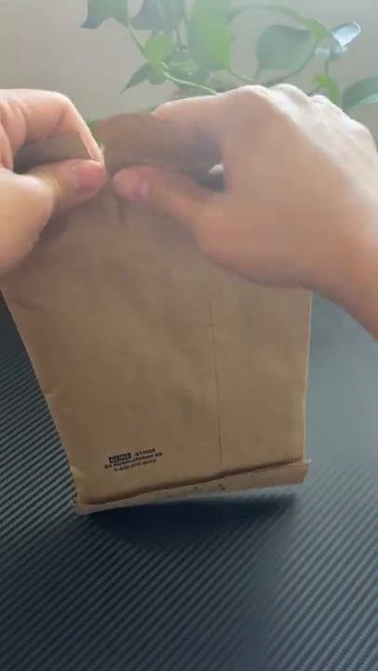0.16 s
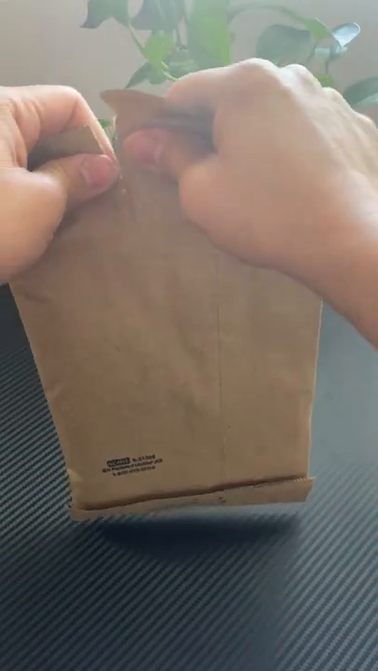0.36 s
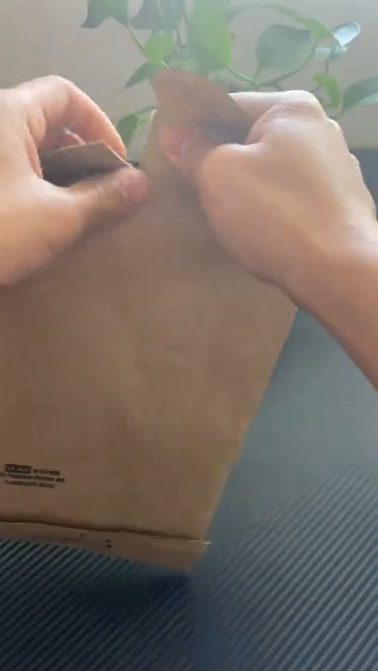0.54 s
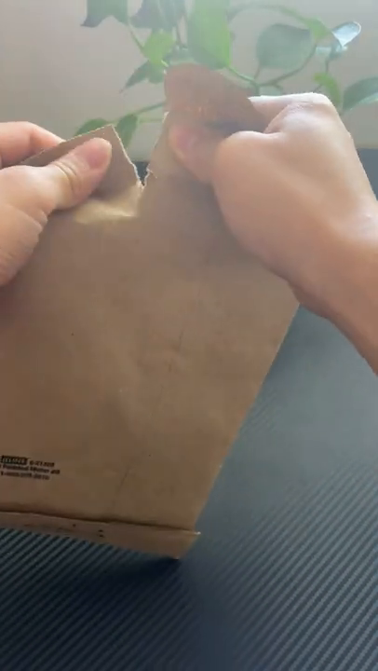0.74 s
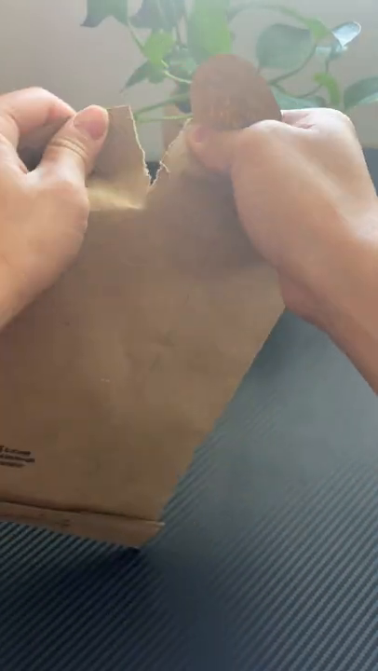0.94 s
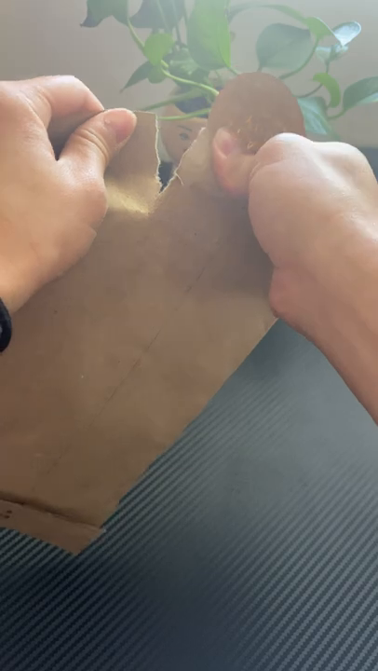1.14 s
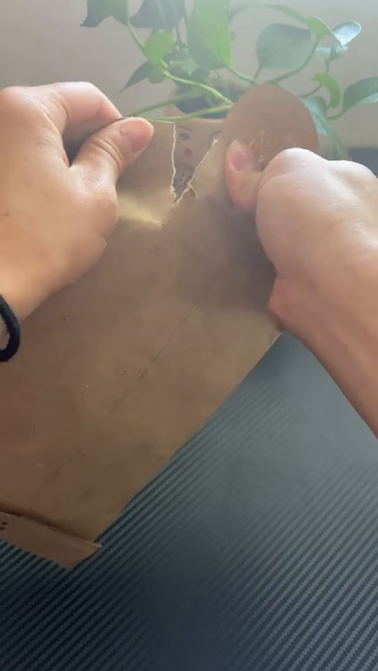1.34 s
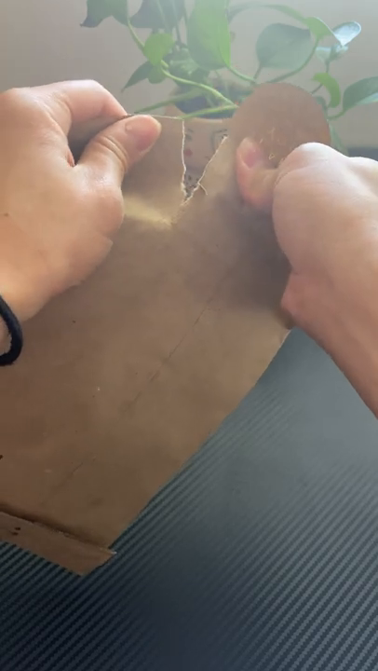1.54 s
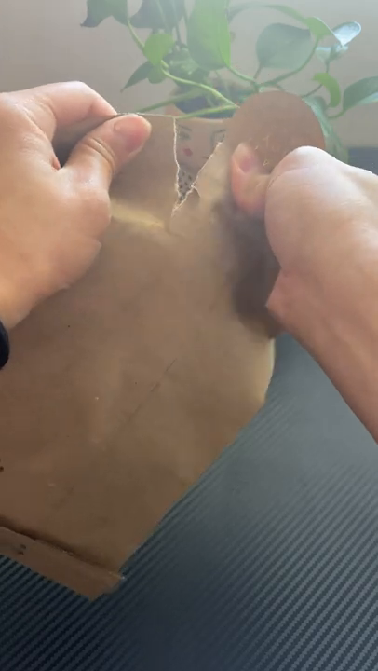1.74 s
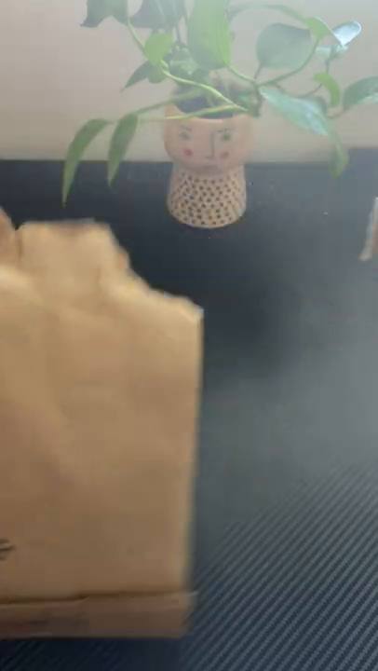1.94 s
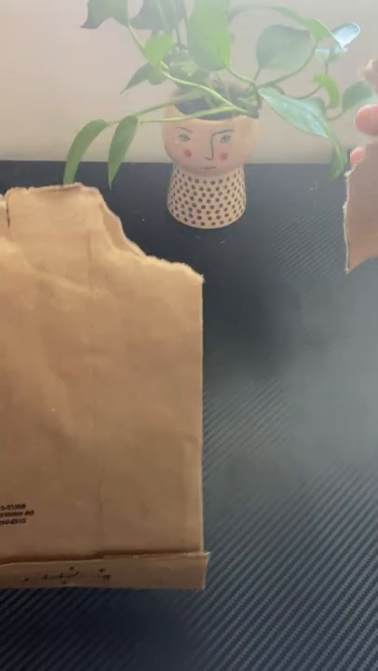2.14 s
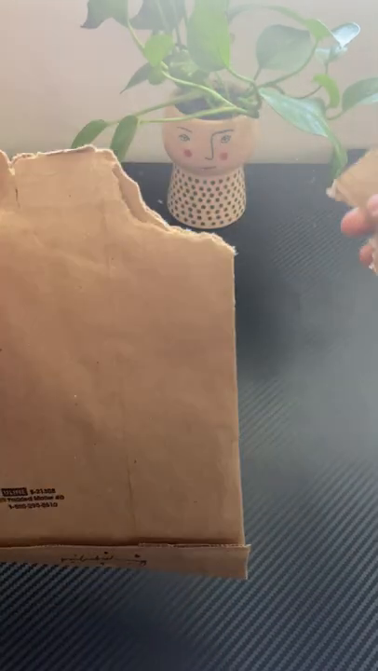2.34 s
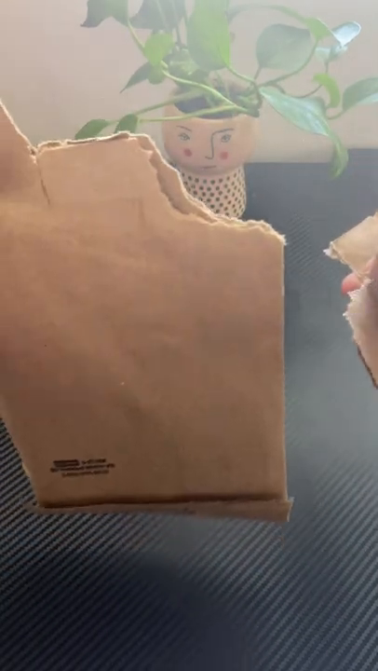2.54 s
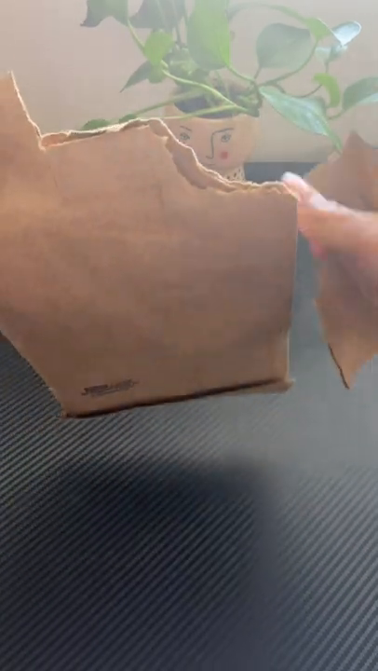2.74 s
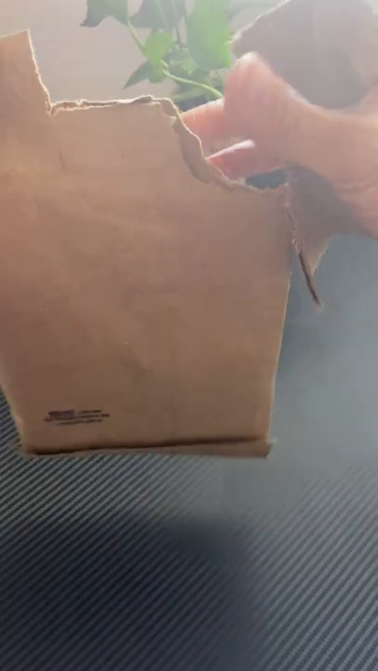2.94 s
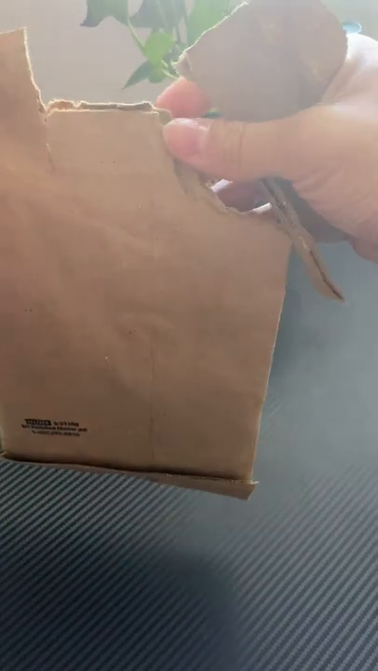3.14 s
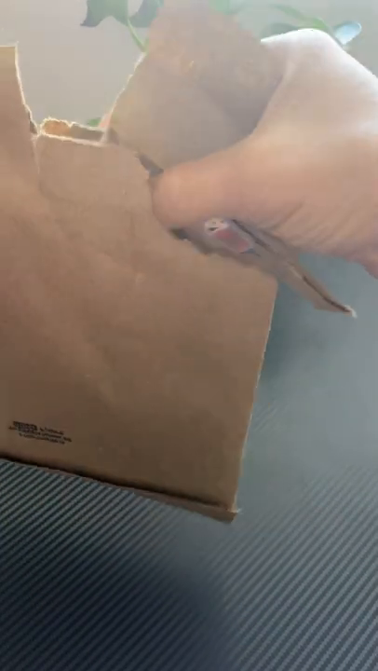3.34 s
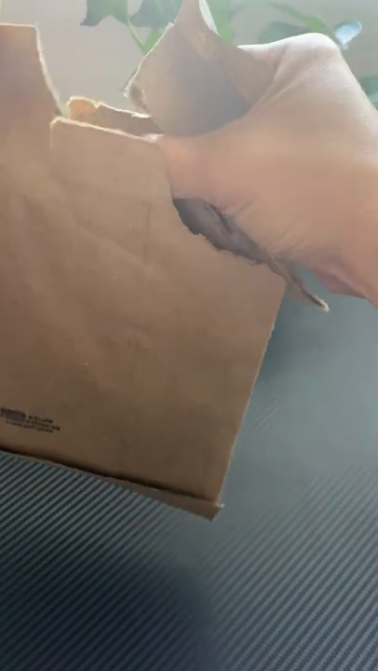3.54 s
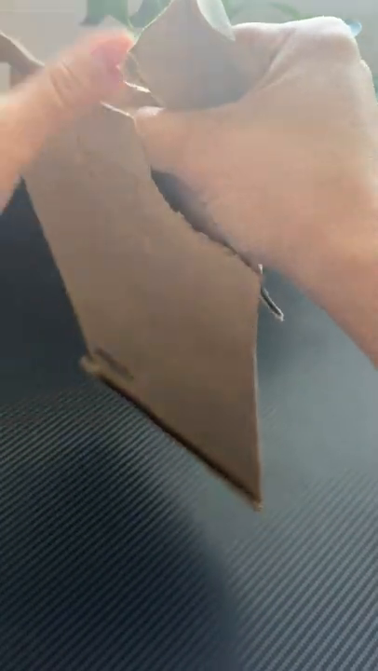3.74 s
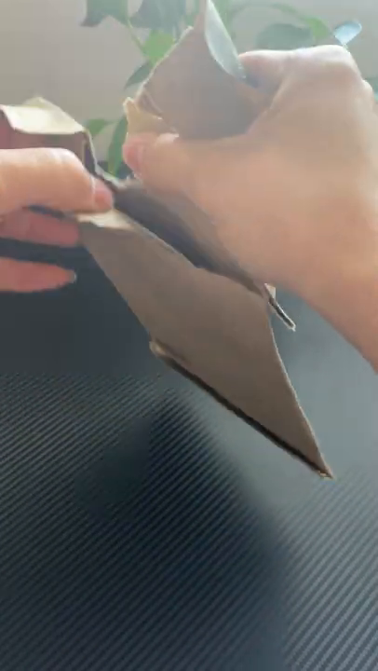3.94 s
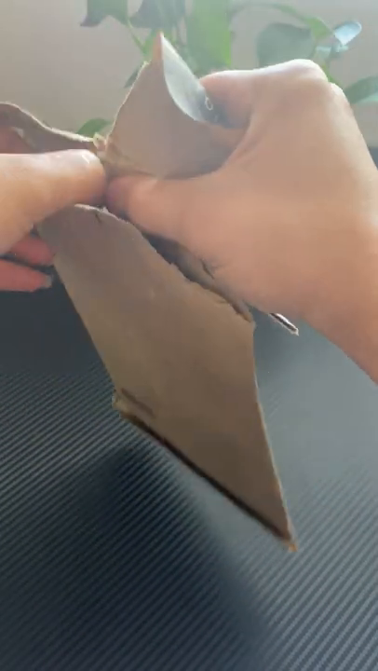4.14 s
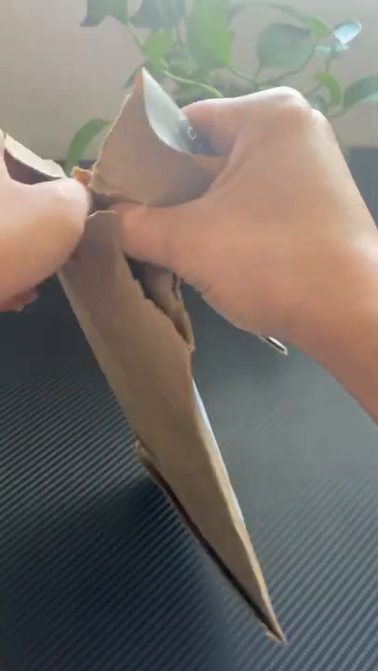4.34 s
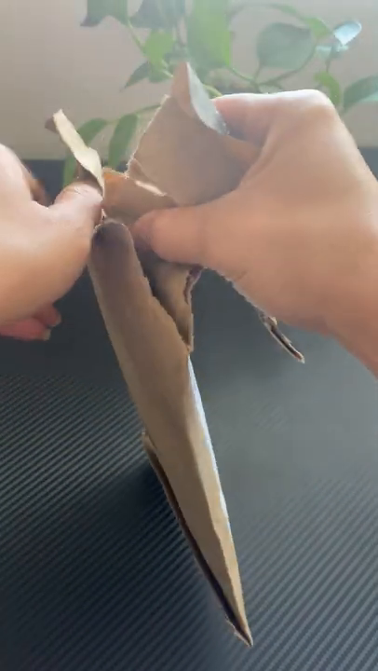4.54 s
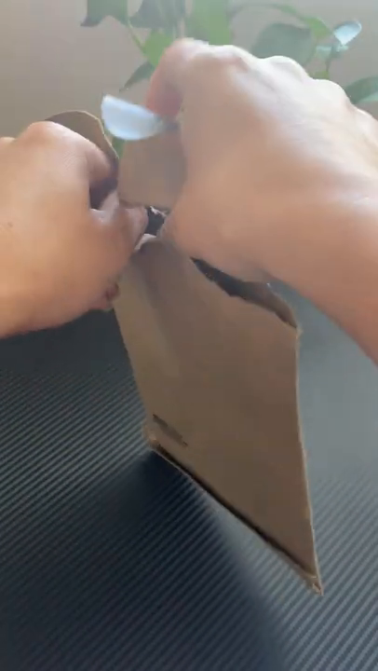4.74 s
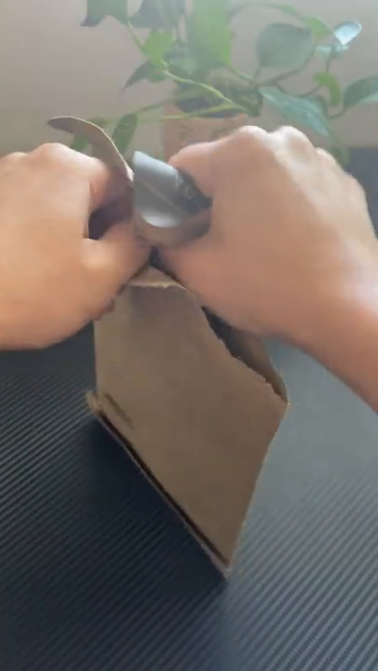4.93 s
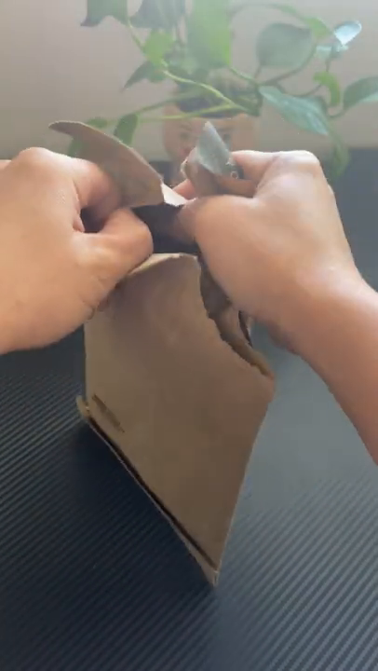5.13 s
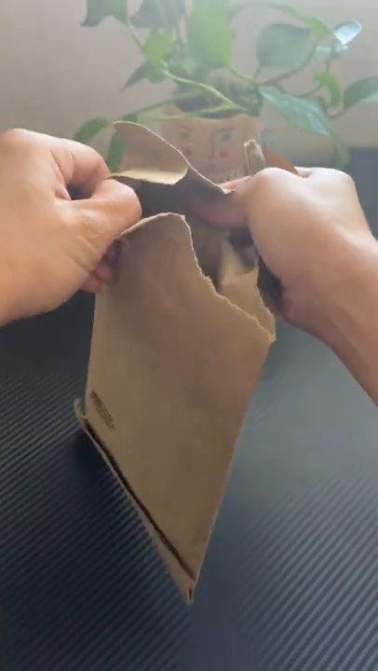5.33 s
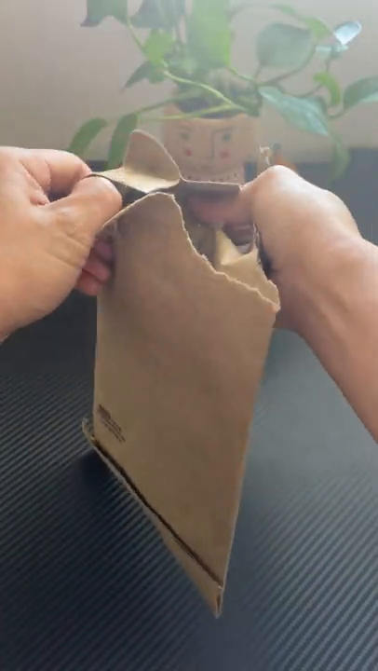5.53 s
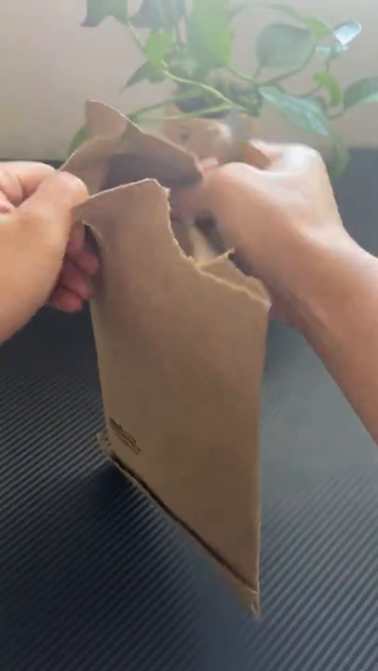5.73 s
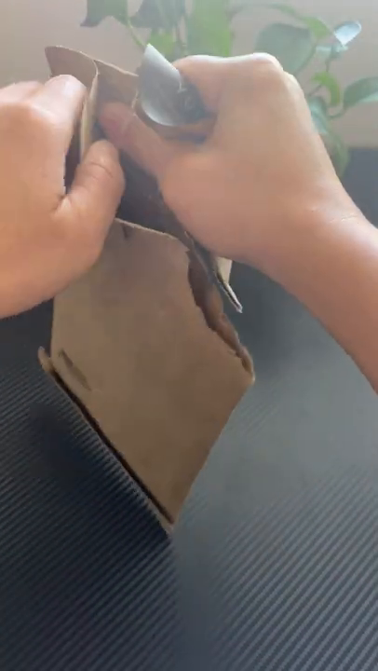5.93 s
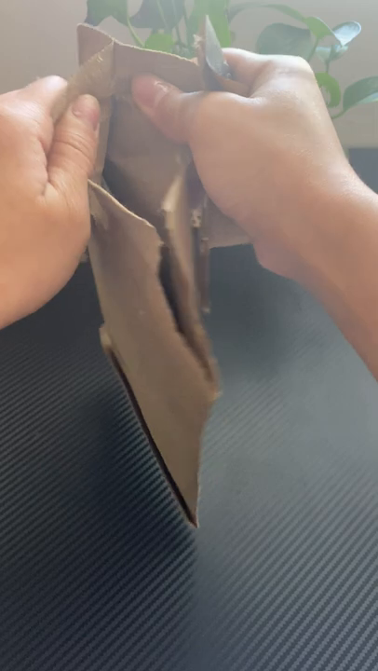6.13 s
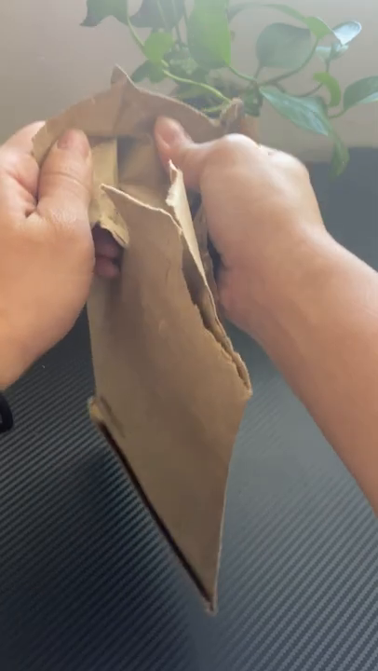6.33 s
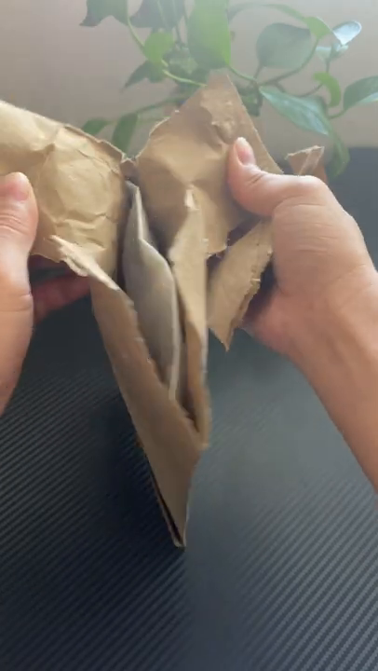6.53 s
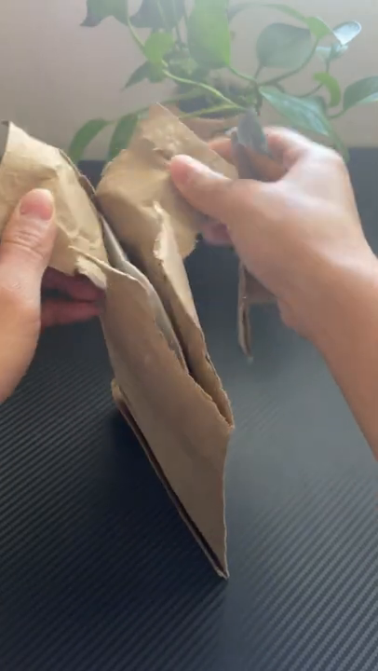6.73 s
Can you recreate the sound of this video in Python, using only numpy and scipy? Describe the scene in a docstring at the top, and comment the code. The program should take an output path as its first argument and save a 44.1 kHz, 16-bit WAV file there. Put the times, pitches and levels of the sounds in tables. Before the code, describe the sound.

A stiff kraft paper bag is handled very close to a stereo microphone in a small, quiet room with faint low noise and hum. From 0 to 0.9 s fingers rub it softly with a slight thin high ring and small crease ticks; a firmer pop and flap comes at 1.0 s, then faint straining until 1.75. At 1.8-2.0 s a loud, coarse, crackling rip bursts out, bright and dry, with panel flaps and a dull desk thud, followed by another flap and bump near 2.05. From 2.2 to 3.9 s there are only quiet rustles and small crinkles. Snaps grow from 4.0 s, with low desk bumps at 4.6 and 5.0 and busy crackling, flaps and sharp bright ticks around 5.15-5.5. Softer crinkling continues, with a pop at 6.1 and a tick at 6.2. A second short, sharp rip with a thud hits at 6.4-6.5 s, then crackly rustling and small bumps to the end near 7 s.

```python
"""A kraft paper mailer is torn by two hands at a desk: the top comes off, then a second rip opens its mouth.
The tears are bunched random breaks; snaps, ticks and straining fibres are short noise bursts.
Rubbing is dense grains under each hand movement; flapping panels add knocks that fall in pitch.
The bag bumps the desk with ragged thuds and ringing modes, in a small, quiet room with a faint hum.
Two microphone ports sit close to the bag and hear it with different phase and level."""
import sys
import numpy as np
from scipy import signal
from scipy.fft import rfft, irfft, next_fast_len
from scipy.io import wavfile
from scipy.ndimage import map_coordinates

SR = 44100
rng = np.random.default_rng(int(sys.argv[2]) if len(sys.argv) > 2 else 0)


def dump_mix(stems):
    """Bounce the given channels to the path in sys.argv[1] as a 16-bit WAV at rate SR."""
    frames = np.atleast_2d(stems).T  # one column per channel
    limited = np.clip(frames, -1, 1)  # hard clip at full scale
    pcm = np.round(limited * 32767).astype(np.int16)
    wavfile.write(sys.argv[1], SR, pcm)


N = 303408  # samples

# running tears, one list of points each: time_s, level_db
TEARS = [
    [(1.795, -34), (1.835, -31.5), (1.872, -34), (1.893, -27), (1.901, -25.5), (1.924, -21.5), (1.94, -28),
     (1.976, -31), (1.985, -44)],
    [(6.41, -53), (6.452, -28), (6.468, -31.5), (6.479, -21), (6.5, -30.5), (6.53, -49)],
]
# buckling creases and breaking fibre bundles:
# start_s, crease_level_db, crease_pitch_hz, crease_width_hz (each resonator), fibre_fizz_db, t60_s (crease)
SNAP_EVENTS = [(0.119, -53.5, 5090.0, 6100.0, -48.5, 0.019), (0.46, -50, 2860, 7500, -47, 0.034),
               (0.561, -49.5, 1580, 1900.0, -49, 0.022), (0.584, -51, 2800, 6000, -46, 0.044),
               (0.65, -50.5, 2390, 1200.0, -58, 0.018), (0.721, -48, 2350, 6100.0, -43, 0.032),
               (0.732, -57, 2500, 4000, -48, 0.008), (0.834, -50, 4300, 2100.0, -48, 0.025),
               (0.984, -48.5, 900.0, 1600.0, -53, 0.023), (1.008, -39, 2500, 3100.0, -47, 0.026),
               (1.031, -35.5, 1500, 3800, -49, 0.008), (1.129, -54, 1580, 1900.0, -67, 0.014),
               (1.147, -54, 2380, 4000, -54, 0.011), (1.19, -56, 2360.0, 4200.0, -60, 0.019),
               (1.234, -54, 1870, 5100.0, -52, 0.017), (1.303, -57, 2780, 6000, -62, 0.008),
               (1.366, -49.5, 3040, 8100, -53, 0.0039), (1.5, -55, 2860.0, 5100.0, -55, 0.029),
               (1.629, -55.5, 3760, 7900, -50.5, 0.014), (1.7731, -35.5, 2220, 4200.0, -48, 0.0069),
               (1.798, -26.5, 4200.0, 8000, -40, 0.009), (1.812, -32, 2360.0, 1900.0, -44, 0.0066),
               (1.8294, -32, 2200, 4000, -40, 0.0078), (1.835, -24, 3380, 8050, -18.5, 0.022),
               (1.843, -31, 3810.0, 8000, -28, 0.009), (1.8827, -25.5, 2080, 5600, -18.5, 0.034),
               (1.895, -32, 2140.0, 5600.0, -29, 0.01), (1.904, -29.5, 2370, 4530, -25, 0.018),
               (1.916, -28, 2580, 5000, -27, 0.02), (1.928, -32.5, 2300, 5000, -29, 0.026),
               (1.957, -41, 2400, 3000, -34, 0.009), (2.041, -39.0, 1620, 4200.0, -42, 0.046),
               (2.457, -54.5, 1930, 2300.0, -62, 0.01), (2.5242, -41.5, 1400, 2100, -63, 0.0071),
               (2.558, -50.5, 2530, 2090, -51, 0.003), (2.58, -55, 1800, 4000, -50, 0.012),
               (2.621, -53.5, 2170, 1100.0, -44, 0.017), (2.972, -54, 1600, 4000, -49, 0.03),
               (3.2393, -48.5, 1500, 2220, -42.5, 0.014), (3.371, -57, 2220, 2500, -54, 0.025),
               (3.388, -48, 2920, 3400.0, -37, 0.03), (3.527, -51.5, 3260, 3000, -41, 0.017),
               (3.578, -48, 2140, 2600.0, -48, 0.028), (3.651, -53, 2310, 900, -61, 0.022),
               (3.668, -52.5, 2440, 1200, -57, 0.018), (3.772, -63, 3500, 6000, -56, 0.008),
               (3.795, -58.5, 2300, 4000, -52, 0.0089), (4.005, -39, 2650, 6700.0, -35.5, 0.013),
               (4.245, -43.5, 1920, 3500.0, -51, 0.0076), (4.286, -37.5, 1440, 1590, -34.5, 0.017),
               (4.305, -39.0, 5650, 8000, -30.5, 0.006), (4.493, -36.5, 2930, 4600, -39.5, 0.084),
               (4.602, -47, 3600, 1900.0, -49, 0.009), (4.674, -53.5, 1010, 500.0, -47, 0.018),
               (4.71, -52, 1090.0, 2800.0, -42.5, 0.026), (4.808, -46, 2590.0, 6700.0, -46, 0.028),
               (4.911, -57, 1770.0, 4600.0, -62, 0.015), (4.981, -46, 2500, 2400, -62, 0.0072),
               (5.141, -42.5, 2120, 5600.0, -41, 0.016), (5.247, -36, 1770.0, 4600.0, -41, 0.012),
               (5.278, -46, 1090.0, 500.0, -35, 0.016), (5.303, -40, 2360.0, 2800.0, -34, 0.014),
               (5.313, -42, 1460.0, 3800.0, -31, 0.014), (5.329, -39.5, 990.0, 2600.0, -40, 0.0092),
               (5.384, -47, 1940.0, 5100.0, -44, 0.0075), (5.494, -44, 1470, 2600.0, -40, 0.037),
               (5.62, -48, 2350, 5000, -37, 0.04), (5.782, -51, 1200, 3000, -39, 0.02),
               (5.841, -41, 1900, 2800, -36, 0.05), (5.886, -43.0, 2360.0, 2780, -55, 0.0089),
               (5.932, -44, 1320.0, 3400.0, -51, 0.012), (6.004, -46.5, 5090.0, 8000, -43.5, 0.018),
               (6.111, -29.5, 940, 1900, -42, 0.0069), (6.1105, -36, 3000, 2400, -46, 0.0077),
               (6.243, -49, 2200, 4500, -45, 0.0098), (6.319, -45, 2360.0, 4160, -38, 0.0038),
               (6.408, -26, 3420, 6200, -23, 0.0059), (6.441, -26.5, 1570, 5500, -21.5, 0.011),
               (6.456, -24.5, 2860.0, 3400.0, -23.5, 0.014), (6.64, -41, 2860.0, 7440, -31.5, 0.023),
               (6.7657, -46, 2360.0, 6100.0, -40, 0.011), (6.81, -44, 1460.0, 1700.0, -53, 0.017)]
# single fibres that part with a thin, bright tick: start_s, level_db
FIBRE_TICKS = [(0.116, -52), (0.69, -43), (0.993, -50), (1.171, -48.5), (1.229, -48), (1.282, -54),
               (1.479, -56), (1.49, -53), (1.575, -54), (1.781, -39), (1.822, -28), (2.057, -49),
               (2.443, -49.5), (3.112, -47), (3.311, -48), (3.547, -43), (3.554, -37), (3.843, -47),
               (4.014, -40), (4.222, -49), (4.559, -51), (4.729, -51), (5.088, -45), (5.114, -40.5),
               (5.155, -24.5), (5.197, -40), (5.252, -26.5), (5.512, -40), (5.519, -24.5), (5.758, -41),
               (5.783, -42.5), (5.924, -42), (6.182, -25), (6.253, -39), (6.289, -43), (6.364, -36.5),
               (6.463, -16.5), (6.517, -34.5), (6.525, -37), (6.557, -28.5), (6.681, -40.5), (6.694, -44),
               (6.76, -37.5), (6.82, -39)]
# paper pulled taut so that its fibres tick apart: start_s, length_s, level_db
TAUT_PULLS = [(1.122, 0.33, -64), (1.47, 0.27, -64), (2.206, 0.62, -75.5), (3.75, 0.17, -60),
              (4.4, 0.42, -61.5), (5.338, 0.58, -55.5), (6.211, 0.4, -53.5)]
# whole panels flipping over: start_s, level_db, pitch_fall_s
PANEL_FLAPS = [(0.986, -39.5, 0.0056), (1.009, -45, 0.0042), (1.836, -24, 0.0083), (1.883, -26.5, 0.0048),
               (1.927, -33, 0.0041), (2.039, -32, 0.006), (2.524, -44, 0.00666), (2.578, -48, 0.0058),
               (3.24, -49, 0.0053), (3.384, -48, 0.0032), (3.889, -46.5, 0.0051), (4.005, -46.5, 0.0053),
               (4.246, -40.5, 0.0042), (4.287, -37.5, 0.0039), (4.555, -42, 0.0062), (4.774, -44.5, 0.0045),
               (5.139, -42.5, .005), (5.277, -36, .006), (5.313, -32, .007), (5.385, -34, 0.0059),
               (5.42, -40.5, 0.00486), (5.819, -38, 0.0051), (5.932, -40.5, 0.005), (6.001, -51, 0.003),
               (6.111, -45, 0.0056), (6.443, -22.5, .0038), (6.641, -35.5, 0.0045), (6.767, -43, 0.0043),
               (6.809, -36.5, 0.0046)]
# finger moves sliding paper on paper: start_s, length_s, level_db, brightness_db (fizz over body)
FINGER_STROKES = [(0, 0.04, -52.5, 2), (0.067, 0.14, -64, 4.5), (0.264, 0.042, -58, 3),
                  (0.337, 0.16, -80, 23), (0.44, 0.33, -52.5, 0), (0.61, 0.039, -47, -0.5),
                  (0.68, 0.11, -51, 0.5), (0.811, 0.028, -47, -14), (0.923, 0.12, -54.5, -4),
                  (0.945, 0.24, -51.5, -5), (1.021, 0.046, -42, -24), (1.963, 0.11, -52, -2),
                  (2.076, 0.43, -68.5, -3), (2.416, 0.33, -57, -4), (2.61, 0.12, -53.5, 2.5),
                  (2.744, 0.46, -62, 3.5), (2.947, 0.079, -51.5, 0), (3.09, 0.065, -51, -3),
                  (3.217, 0.48, -53, 3.5), (3.352, 0.04, -52, 4), (3.509, 0.21, -49, 1),
                  (3.947, 0.14, -51.5, 1), (4.112, 0.083, -52.5, 2.5), (4.26, 0.053, -43.5, -2.5),
                  (4.48, 0.069, -44.5, -1.5), (4.342, 0.2, -59, 6), (4.552, 0.27, -51, -0.5),
                  (4.82, 0.1, -40.5, -3), (4.967, 0.17, -50, 2), (5.17, 0.045, -43, 5),
                  (5.228, 0.11, -36.5, 1), (5.406, 0.5, -49, -1.5), (5.524, 0.19, -44, -0.5),
                  (5.595, 0.025, -39, 1), (5.75, 0.13, -44.5, -6), (5.82, 0.1, -42.5, 4),
                  (5.913, 0.1, -47.5, 0), (6.03, 0.098, -55.5, -1), (6.088, 0.24, -47, 0),
                  (6.211, 0.32, -46.5, 5.5), (6.515, 0.21, -48.5, -2), (6.749, 0.11, -46.5, -0.5)]
# resonances of the taut sheet while it tears: pitch_hz, width_hz, gain_db
TAUT_RESONANCES = [(510, 68, 0), (2350, 270, 0.5), (4480, 1500, -7.5)]
# colour of the paper bag, only its shape matters: frequency_hz, gain_db
PAPER_COLOUR = [(50, -24), (140, 4), (300, 6.5), (430, 9.5), (580, 5), (780, -3), (1150, 4.5), (1650, -4),
                (2300, 1), (3200, -5.5), (4800, -2), (7000, 3.5), (10300, 6.5), (15700, 2)]
# the bag or a wrist bumping the desk: start_s, level_db
DESK_BUMPS = [(1.897, -29.5), (2.04, -30.5), (2.09, -37.5), (2.232, -48), (3.24, -40.5), (4.636, -31.5),
              (4.695, -37.5), (5.002, -31.5), (5.161, -31), (5.311, -37.5), (5.621, -45), (5.995, -39),
              (6.443, -27), (6.565, -31.5), (6.767, -33.5)]
# modes of the desk top: pitch_hz, level_db (varied a little at each bump), t60_s
DESK_MODES = [(57.3, -6.5, 0.68), (87, -8, 0.11), (145, -14.5, 0.26)]
# reflected share of the paper sound: frequency_hz, gain_db
REFLECTED_SHARE = [(150, -16), (500, -6), (1200, -8), (2400, -4), (5200, -5), (7000, -15), (10000, -12),
                   (14000, -17)]
# decay of the room tail: frequency_hz, t60_s
ROOM_DECAY = [(100, 0.17), (500, 0.3), (3000, 0.3), (14000, 0.086)]
# colour of the room noise, only its shape matters: frequency_hz, gain_db
ROOM_NOISE = [(15, -29), (25, 9), (64, 8), (192, -2.5), (278, 4), (482, -9), (711, -33), (1210, -33),
              (1820, -32), (2340, -25.5), (3160, -30), (5500, -30), (7000, -58), (13200, -120)]
# part of the room noise that differs between the ports, over the shared part: frequency_hz, gain_db
PORT_NOISE = [(60, -16.5), (250, -24.5), (800, 19.5), (3000, 4.5)]
# phase by which the left port leads the right: frequency_hz, lead_rad
PORT_LEAD = [(100, 0), (550, -.15), (900, 1), (1700, .1), (3100, 1.2), (4000, .6), (5200, .6), (7200, 3.14),
             (13600, 9.42), (16000, 12)]
# level of the left port over the right: frequency_hz, difference_db
PORT_BALANCE = [(60, 0), (250, -5), (550, -7), (1000, 0), (1600, 0), (2600, -5), (3500, -2), (4600, -4),
                (6500, 0)]

TOP_HZ = 15780  # nothing above this is heard
ATTACK_S, RELEASE_T60 = 0.021, 0.14  # s: a move takes hold, and dies away once the hand stops
HOLD_DB = -68  # the bag rustles faintly just from being held


def tearing(knock_db=-7, body_db=-2, fizz_db=-1):
    """The tear front runs through the sheet, breaking fibres in quick bunches while the taut sheet rings."""
    force = np.zeros(N)
    for tear in TEARS:
        times, levels = np.transpose(tear)
        force += amp(np.interp(np.arange(N) / SR, times, levels, left=-120, right=-120))
    breaks = force * grains(rate=9800, spread_db=10.5, clump_rate=540, clump_db=-1.5)
    ringing = sum(amp(db) * resonate(breaks, hz, width) for hz, width, db in TAUT_RESONANCES)
    return amp([[knock_db], [body_db], [fizz_db]]) * (breaks + ringing)


def snapping(knock_db=-6.0, knock_crease_hz=1500, knock_life=1.3, fizz_life=1.0, rise_s=0.0015,
             settle_db=-24, settle_t60=0.14):
    """Each snap swells quickly and rings its own crease; the sheet then settles with a dull rustle."""
    pushes, t = np.zeros((3, N)), np.arange(SR // 12) / SR
    life = np.array([[knock_life], [1], [fizz_life]])  # large folds ring longer than fibres
    rise, age = np.minimum(t / rise_s, 1) ** 2, np.maximum(t - rise_s, 0)
    settle = np.outer([1, 1, 0], amp(settle_db - 60 * age / settle_t60))
    for s, db, hz, width, fizz_db, t60 in SNAP_EVENTS:
        decay = amp(-60 * age / (life * t60))
        burst = rise * (decay + settle) * rng.standard_normal((3, len(t)))
        burst[1] = resonate_twice(burst[1], hz, width)
        # small, high creases shake the panel less
        knock = amp(db + knock_db) * min(1, knock_crease_hz / hz)
        levels = np.array([[knock], [amp(db)], [amp(fizz_db)]])
        add(pushes, s, levels * equal_energy(burst))
    return pushes


def ticking(body_db=-14, rise_s=0.0013, t60=0.0059):
    """A parting fibre is nearly all treble and shakes the sheet around it only a little."""
    pushes, t = np.zeros((3, N)), np.arange(SR // 50) / SR
    shape = np.minimum(t / rise_s, 1) ** 2 * amp(-60 * np.maximum(t - rise_s, 0) / t60)
    for s, db in FIBRE_TICKS:
        burst = equal_energy(shape * rng.standard_normal((2, len(t))))
        add(pushes[1:], s, amp([[db + body_db], [db]]) * burst)
    return pushes


def straining(knock_db=-10, body_db=2, fizz_db=2, tick_t60=0.0068):
    """Single fibres tick apart while the paper is pulled."""
    tension = sum(amp(db) * gesture(start, length) for start, length, db in TAUT_PULLS)
    ticks = crackles(rate=55, spread_db=4, t60=tick_t60)
    return amp([[knock_db], [body_db], [fizz_db]]) * tension * ticks


def flapping(lead_db=2, push_db=-7, puff_db=0.0, drop_hz=1400, end_hz=50, t60=0.051, rise_s=0.0014):
    """A flipping panel's bending wave arrives high part first, so its knock drops; a puff of air goes along."""
    pushes, t = np.zeros((3, N)), np.arange(SR // 8) / SR
    shape = np.minimum(t / rise_s, 1) * amp(-60 * t / t60)
    for s, db, fall_s in PANEL_FLAPS:
        hz = end_hz + drop_hz / (1 + t / fall_s) ** 2
        push = np.sin(2 * np.pi * np.cumsum(hz) / SR)
        puff = amp(puff_db) * rng.standard_normal(len(t))
        add(pushes[0], s, amp(db) * shape * (amp(push_db) * push + puff))
        # the high front of the wave
        add(pushes[1], s, amp(db + push_db + lead_db) * shape * push)
    return pushes


def rubbing(knock_db=-6, body_db=-2.0, fizz_db=-0.5, slip_db=-3, crinkle_db=-6.0, crackle_db=-6,
            waver_db=1.68, fold_hz=2300, fold_width=0.56, crinkle_t60=0.012):
    """Sliding paper gives a dense hiss of slips; folds crinkle and surface fibres crackle as it bends."""
    power = np.full((2, N), amp(HOLD_DB) ** 2)
    for start, length, db, bright in FINGER_STROKES:
        power += np.outer(amp([db, db + bright]) ** 2, gesture(start, length) ** 2)
    body, fizz = np.sqrt(power) * amp(waver_db * wobble(25))
    slips = amp(slip_db) * grains(rate=6000, spread_db=4, clump_rate=130, clump_db=2.5)
    folds = amp(crinkle_db) * crinkles(rate=300, centre_hz=fold_hz, scatter_oct=.42, drift_oct=.35,
                                       width_share=fold_width, t60=crinkle_t60)
    fibres = amp(crackle_db) * crackles(rate=300, spread_db=3, t60=.006)
    body_push = body * (slips + folds)
    fizz_push = fizz * (slips + fibres)
    return amp([[knock_db], [body_db], [fizz_db]]) * [body_push, body_push, fizz_push]


def thin_ring(pushes, ring_db=-1, ring_hz=5400, width_hz=650, gone_s=0.7):
    """At first rubbing also carries a thin high ring, which fades out just before gone_s."""
    fade = np.clip((gone_s - np.arange(N) / SR) / RELEASE_T60, 0, 1)
    return pushes + amp(ring_db) * fade * resonate(pushes, ring_hz, width_hz)


def sheet(pushes, knock_hz=640, fizz_hz=6800):
    """Three rows of pushes sound the paper: whole panels (knock), creases (body) and fibres (fizz)."""
    def response(hz):
        low = 1 / (1 + (hz / knock_hz) ** 8)
        high = 1 - 1 / (1 + (hz / fizz_hz) ** 8)
        shares = np.array([low, np.abs(1 - low - high), high])
        colour = amp(along(PAPER_COLOUR, hz))
        # each band passes white noise at its own level
        band_rms = np.sqrt(np.mean((shares * colour) ** 2, axis=1, keepdims=True))
        return causal(colour) * shares / band_rms
    return filtered(pushes, response).sum(axis=0)


def scattered(paper, sway_db=-0.65, sway_rate=40):
    """The creases lie all over the bag, so the paper sways a little between the ports."""
    return paper * amp(np.outer([1, -1], sway_db * wobble(sway_rate)))


def bumping(thud_db=5, start_hz=210, end_hz=66, fall_s=0.01, thud_t60=0.096, rise_s=0.0062, rough=1.3,
            rumble_db=-5, rumble_hz=74, rumble_t60=0.3, scuff_db=-4, scuff_hz=170, scuff_t60=0.16):
    """Bending waves cross the desk, the high ones first, as a ragged thud; its low modes ring and rumble on."""
    desk, t = np.zeros(N), np.arange(SR // 2) / SR
    rise = 1 - np.exp(-(t / rise_s) ** 2)
    for s, db in DESK_BUMPS:
        first_hz = start_hz * amp(rng.normal(0, 0.8))
        hz = end_hz + (first_hz - end_hz) * np.exp(-t / fall_s)
        waver = rough * map_coordinates(rng.standard_normal(80), [t * 150])  # radians
        thud = np.sin(2 * np.pi * np.cumsum(hz) / SR + waver) * amp(thud_db - 60 * t / thud_t60)
        ring = np.zeros(len(t))
        for mode_hz, level, t60 in DESK_MODES:
            tone = np.sin(2 * np.pi * (mode_hz * t + rng.random()))
            ring += tone * amp(level + rng.normal(0, 2.5) - 60 * t / t60)
        rumble = unit(resonate_twice(rng.standard_normal(len(t)), rumble_hz, rumble_hz))
        rumble *= amp(rumble_db - 60 * t / rumble_t60)
        # the bag drags for a moment as it lands
        scuff = unit(resonate_twice(rng.standard_normal(len(t)), scuff_hz, 2 * scuff_hz))
        scuff *= amp(scuff_db - 60 * t / scuff_t60)
        add(desk, s, amp(db) * rise * (thud + ring + scuff + rumble))
    return desk


def room(x, early_db=12, early_t60=0.023, delay_s=0.00101):
    """Desk and near wall answer each port almost at once; the room adds a short diffuse tail."""
    hz, t, cells = signal.stft(rng.standard_normal((2, SR // 2)), SR, nperseg=256)
    late = amp(-60 * t / along(ROOM_DECAY, hz)[:, None])
    early = amp(early_db - 60 * t / early_t60)
    tail = signal.istft(cells * (late + early), SR, nperseg=256)[1]
    tail = np.pad(tail / np.linalg.norm(tail[0]), ((0, 0), (round(delay_s * SR), 0)))
    reflected = signal.fftconvolve(x[None], tail, axes=1)[:, :N]
    return filtered(reflected, lambda hz: amp(along(REFLECTED_SHARE, hz)))


def background(noise_db=-52, hum_db=-60, hum_hz=59, low_hz=33):
    """Steady room noise, alike at both ports in the bass and more diffuse above, and a faint wavering hum."""
    differing = filtered(rng.standard_normal((2, N)), lambda hz: amp(along(PORT_NOISE, hz)))
    noise = rng.standard_normal(N) + differing
    hum = np.sin(2 * np.pi * hum_hz * np.arange(N) / SR + wobble(25))

    def colour(hz):
        return amp(along(ROOM_NOISE, hz)) / (1 + (low_hz / (hz + 1)) ** 4)
    return amp(noise_db) * unit(filtered(noise, colour)) + amp(hum_db) * hum


def gesture(start, length, arch_db=2.5):
    """Gain of one hand move: attack around its start, a hold that swells towards its middle, release."""
    age = np.arange(N) / SR - start
    swell = arch_db * (np.sin(np.pi * np.clip(age / length, 0, 1)) - .5)
    release = 60 * np.clip((age - length) / RELEASE_T60, 0, 2)
    return np.clip(age / ATTACK_S + .5, 0, 1) * amp(swell - release)


def grains(rate, spread_db, clump_rate, clump_db):
    """Tiny slips or breaks at random moments (rate a second), of uneven size, in clumps; rms 1."""
    hit = rng.random(N) < rate / SR
    spread = spread_db * np.clip(rng.standard_normal(N), -2, 2)
    clumps = clump_db * np.clip(wobble(clump_rate), -2, 2)
    return unit(hit * amp(spread + clumps) * rng.choice([-1, 1], N))


def crackles(rate, spread_db, t60):
    """Sparse crackles (rate a second) of uneven size, each a short dying burst of noise; rms 1."""
    size = (rng.random(N) < rate / SR) * amp(spread_db * np.clip(rng.standard_normal(N), -2, 2))
    envelope = signal.lfilter([1], [1, -amp(-60 / (t60 * SR))], size)
    return unit(envelope * rng.standard_normal(N))


def crinkles(rate, centre_hz, scatter_oct, drift_oct, width_share, t60):
    """Small folds give way one by one, each at its own pitch, drifting as the bag bends; rms 1."""
    out, t = np.zeros(N), np.arange(SR // 40) / SR
    drift = drift_oct * np.clip(wobble(9), -1.5, 1.5)
    for i in np.flatnonzero(rng.random(N) < rate / SR):
        pitch, size = np.clip(rng.standard_normal(2), -2, 2)
        hz = min(centre_hz * 2 ** (drift[i] + scatter_oct * pitch), SR / 4)
        ring = resonate(rng.standard_normal(len(t)) * amp(-60 * t / t60), hz, width_share * hz)
        add(out, i / SR, amp(3.4 * size) * unit(ring))
    return unit(out)


def resonate(x, hz, width):
    """One resonance of gain 1 at its centre, its width in Hz held to a quarter of SR."""
    return signal.lfilter(*signal.iirpeak(hz, hz / min(width, SR / 4), SR), x)


def resonate_twice(x, hz, width):
    """Two equal resonances in a row, for steeper skirts."""
    return resonate(resonate(x, hz, width), hz, width)


def equal_energy(bursts):
    """Give each row the energy of 12 ms at rms 1."""
    return bursts * np.sqrt(.012 * SR) / np.linalg.norm(bursts, axis=1, keepdims=True)


def wobble(rate):
    """A smooth random curve, rate knots a second."""
    return map_coordinates(rng.standard_normal(int(N * rate / SR) + 4), [np.arange(N) * rate / SR])


def filtered(x, response):
    """Filter x, zero-padded, by a complex response of frequency."""
    m = 2 * next_fast_len((N + SR) // 2)
    return irfft(rfft(x, m) * response(np.fft.rfftfreq(m, 1 / SR)), m)[..., :N]


def causal(gain):
    """The minimum-phase response with this gain, which rings only after the blow."""
    cepstrum = irfft(np.log(np.maximum(gain, 1e-6)))
    half = cepstrum.shape[-1] // 2
    cepstrum[..., 1:half] *= 2
    cepstrum[..., half + 1:] = 0
    return np.exp(rfft(cepstrum))


def along(points, hz):
    """Read (frequency_hz, value) points on a log frequency axis."""
    f, v = np.transpose(points)
    return np.interp(np.log(hz + 1), np.log(f + 1), v)


def add(track, s, x):
    """Mix x into track from time s on."""
    part = track[..., round(s * SR):][..., :x.shape[-1]]
    part += x[..., :part.shape[-1]]


def amp(db):
    """Decibels to gain."""
    return 10 ** (np.asarray(db) / 20)


def unit(x):
    """Scale to rms 1."""
    return x / np.sqrt(np.mean(x ** 2) + 1e-20)


def scene():
    """The paper close by in its room, the desk under it and the quiet behind."""
    pushes = tearing() + snapping() + ticking() + straining() + flapping() + thin_ring(rubbing())
    paper = sheet(pushes)
    # the reflections shift between two patterns as the bag is turned about
    turn = 1.5 * wobble(5)  # radians
    reflections = room(paper * np.cos(turn)) + room(paper * np.sin(turn))
    return scattered(paper) + reflections + bumping() + background()


def record(dry, low_cut_hz=40):
    """The two ports differ in phase and level across the band; peaks are rounded, deep bass and top cut."""
    def ports(hz):
        lead = np.interp(hz, *np.transpose(PORT_LEAD))
        left = amp(along(PORT_BALANCE, hz) / 2) * np.exp(.5j * lead)
        return np.array([left, 1 / left]) * causal(1 / np.sqrt(1 + (low_cut_hz / (hz + 1)) ** 8))
    pair = filtered(dry, ports)
    rounded = pair / (1 + (pair / .85) ** 6) ** (1 / 6)
    return filtered(rounded, lambda hz: 1 / (1 + (hz / TOP_HZ) ** 200))


dry = scene()
out = record(dry)
dump_mix(out)
```